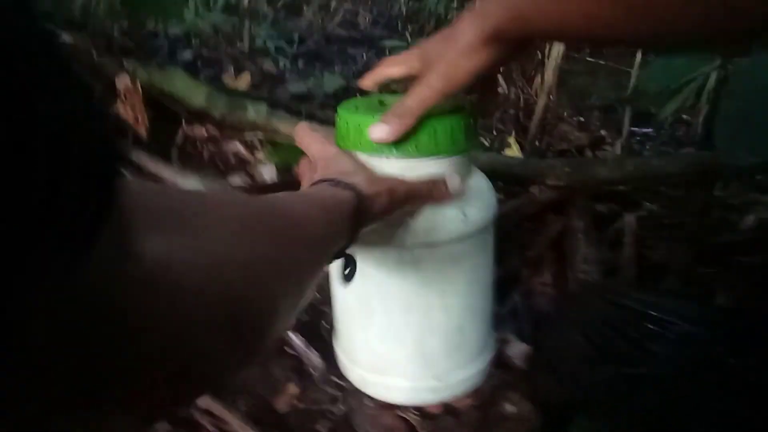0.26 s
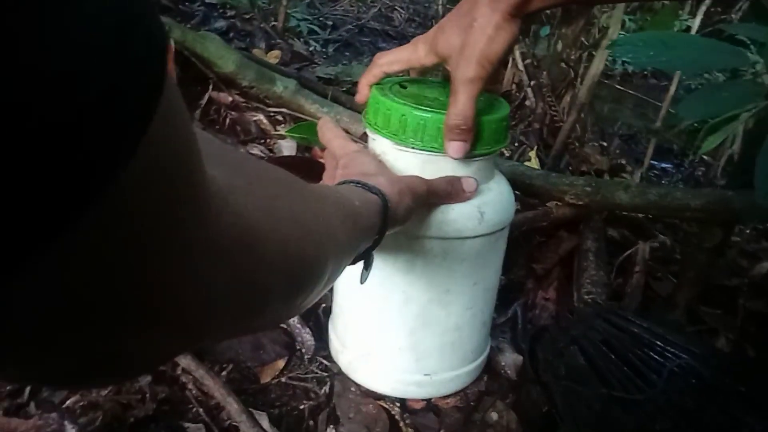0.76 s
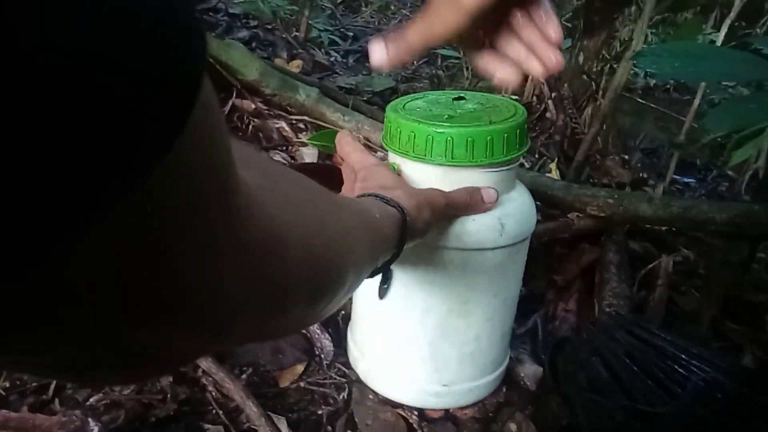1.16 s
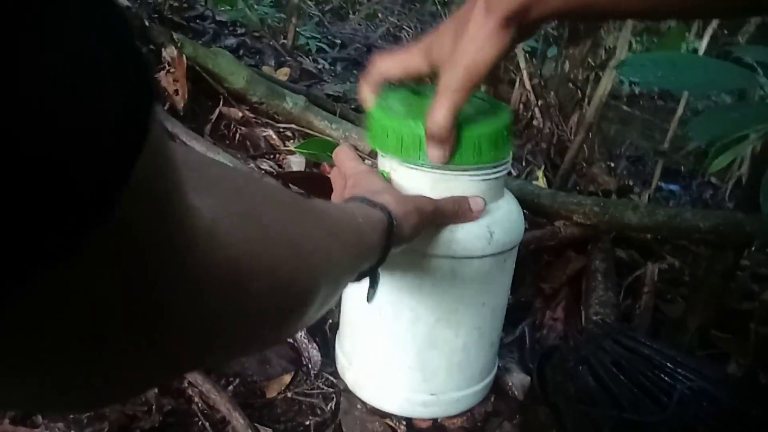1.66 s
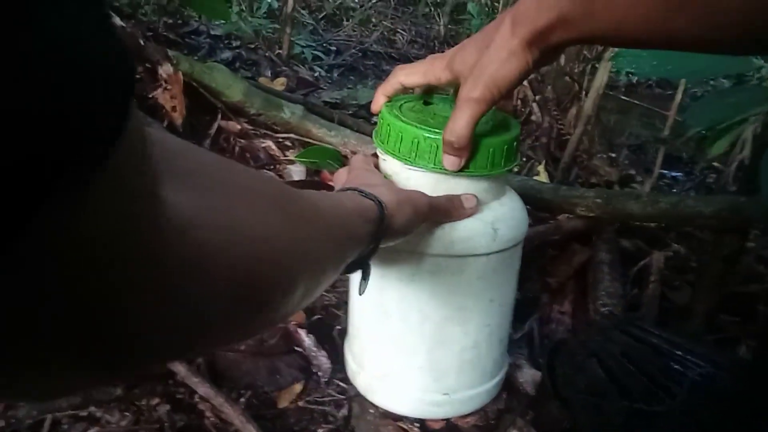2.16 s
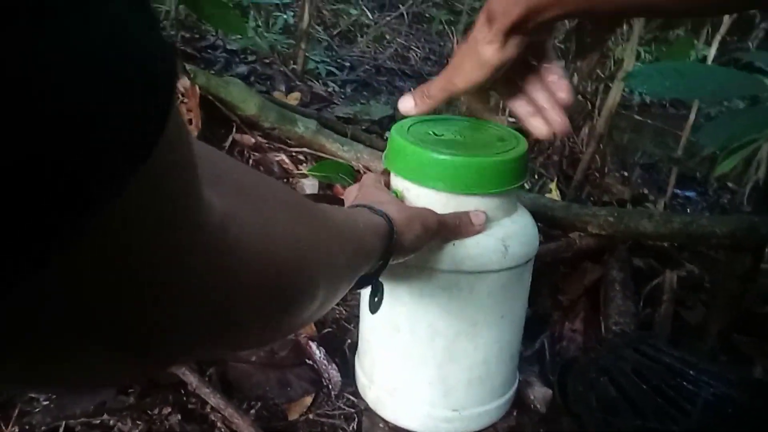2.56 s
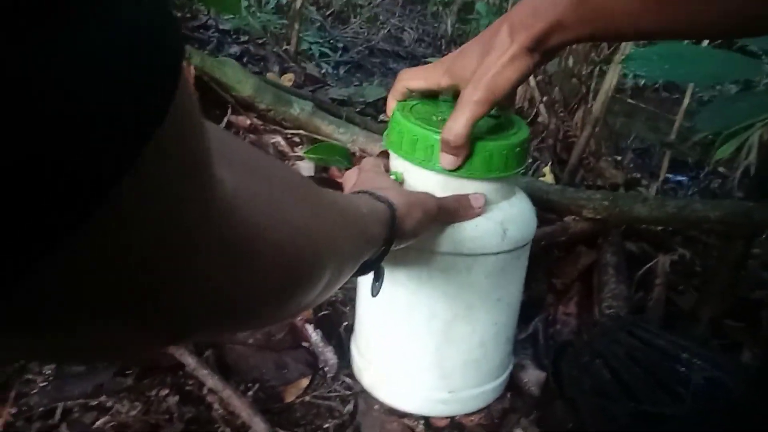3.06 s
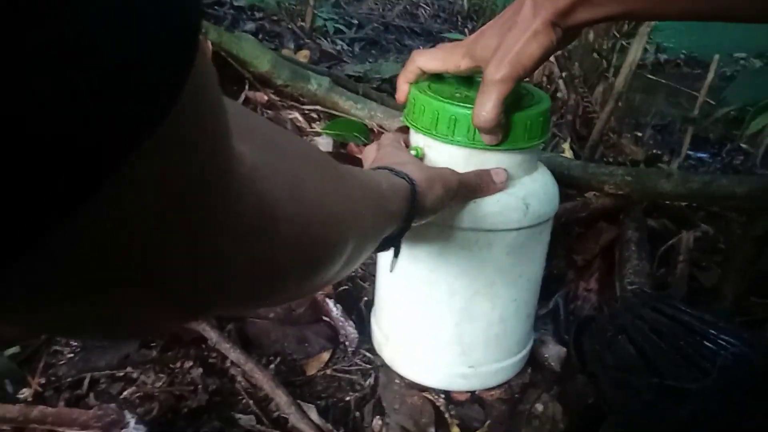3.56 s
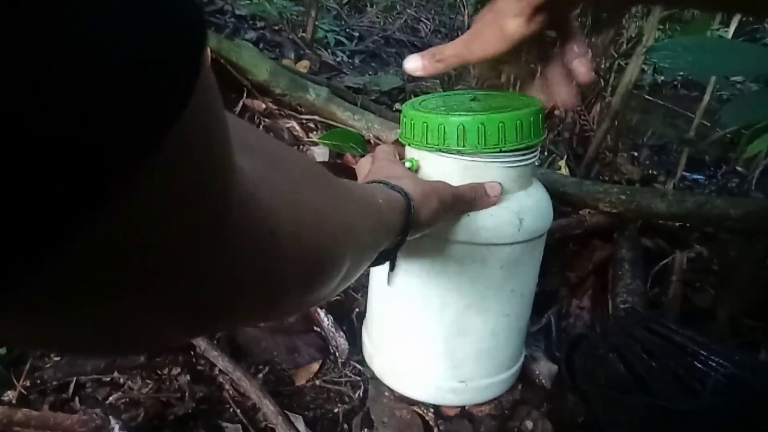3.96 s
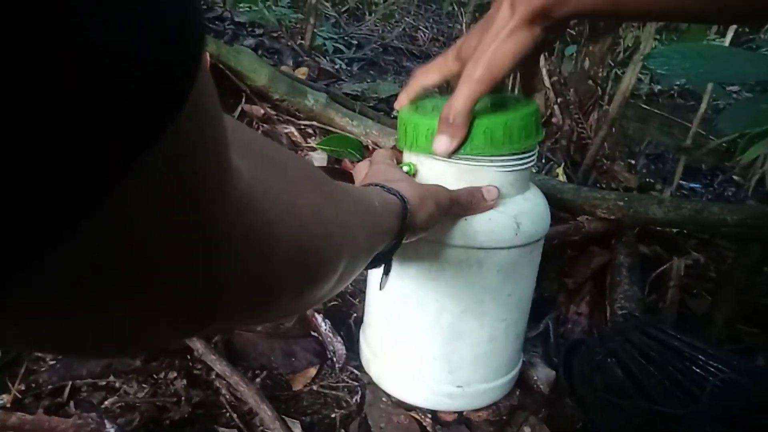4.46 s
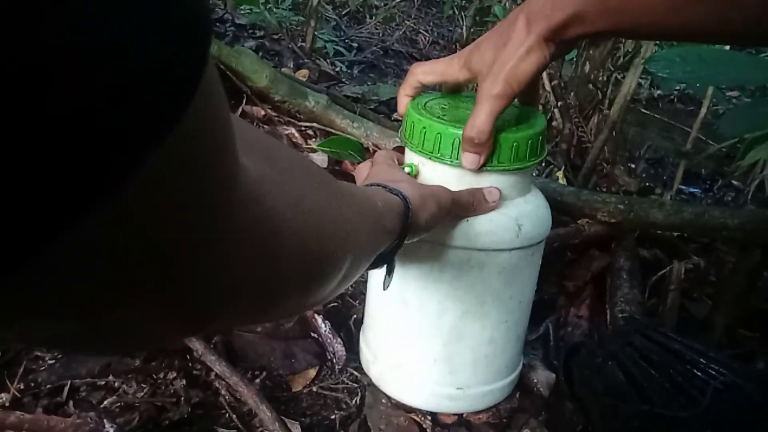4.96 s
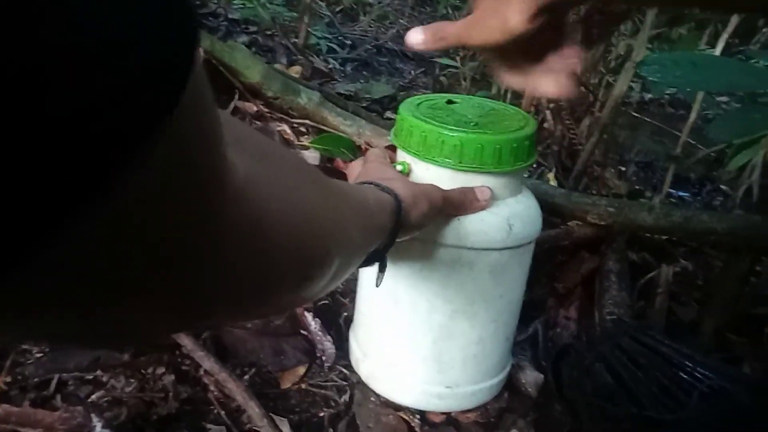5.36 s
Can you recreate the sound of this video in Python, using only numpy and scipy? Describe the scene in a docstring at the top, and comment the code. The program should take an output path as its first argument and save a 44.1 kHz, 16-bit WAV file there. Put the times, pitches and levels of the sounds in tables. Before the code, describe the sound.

Outdoors, dry and close, about 5.6 seconds. Leaf litter rustles and crackles at the start, with a dull footfall and small twig snaps, fading after 0.8 s, while soft finger taps barely sound. At 1.05 s a strong hollow plastic knock rings the big jar, followed by a short scrape and weaker knocks to 1.25. Around 1.8 s lifted-lid knocks pop higher; at 2.25-2.45 s another cluster falls in pitch. A thread scrape swells at 2.6-2.8 into knocks, then muted taps at about 3 s and near quiet. A scrape from 3.8 leads to a busy rattle of knocks until 4.0; softer ones follow at 4.3, higher pops at 4.6 and 4.95, dull taps at 5.1-5.2. A swelling scrape at 5.3 ends in the loudest round thump at 5.38. Throughout, faint shrill insects with thin gliding whines, soft airy wash, and a distant low engine throbbing about sixteen times a second, gradually weakening overall.

```python
"""A big plastic jar stands on a forest floor, close by, while a hand tries its screw lid.
The lid knocks on the neck and scrapes along the thread; each knock or finger tap rings the thin shell
and thumps the air inside, whose pitch rises when the lid is lifted.
Underfoot, leaf litter rustles, mostly at first, as random crackle through resonances; insects sing and
whine all around as narrow noise bands, and an engine throbs far away as low booms under a soft wash of air."""
import sys
import numpy as np
from scipy import signal
from scipy.fft import rfft, irfft, next_fast_len
from scipy.io import wavfile
from scipy.ndimage import map_coordinates

SR = 44100
rng = np.random.default_rng(int(sys.argv[2]) if len(sys.argv) > 2 else 0)


def to_wav(s):
    """Save 16-bit WAV."""
    ch = np.atleast_2d(s).T  # columns
    pcm = np.round(np.clip(ch, -1, 1) * 32767)  # PCM
    wavfile.write(sys.argv[1], SR, pcm.astype(np.int16))


N = 247489


def jar():
    """Knocks and scrapes leave through the jar, which is too small to radiate much bass."""
    leak_hz = 172
    bass_loss = signal.butter(4, leak_hz, "high", fs=SR, output="sos")
    return signal.sosfilt(bass_loss, knocks() + scrapes())


# The lid's edge knocks on the neck; pitch is that of the air in the jar, levels are relative:
# start_s [s], pitch_hz [Hz], air_db [dB], shell_ring_db [dB], click_db [dB]
EDGE_KNOCKS = [(1.036, 265, -31.5, -56, -68), (1.054, 258.2, -8, -23, -26.5),
               (1.173, 276.6, -16.5, -39, -55), (1.242, 285.6, -24.5, -34.5, -47),
               (1.801, 321.4, -28.5, -60, -52), (1.823, 353.2, -18.5, -48, -54),
               (1.847, 443, -17, -37, -31), (1.864, 461, -24.5, -37, -48),
               (2.253, 421.6, -14.5, -32, -36.5), (2.264, 417.8, -14, -54, -63),
               (2.296, 386.7, -22, -43, -60), (2.329, 350.2, -33.5, -44, -48.5),
               (2.425, 291, -15.5, -28.5, -29.5), (2.455, 265.8, -23.5, -54, -58),
               (2.717, 326, -13.5, -43, -41.5), (2.735, 300.4, -34, -38, -41), (2.772, 287, -15, -37, -64),
               (3.888, 233, -13, -32, -37.5), (3.916, 267.7, -23, -43, -48),
               (3.937, 431.5, -30, -28.5, -29), (3.947, 372, -29, -27.5, -36.5),
               (3.958, 291.2, -12.5, -34, -41), (3.986, 248.3, -16.5, -28.5, -42.5),
               (4.005, 290.5, -13.5, -33, -37), (4.3, 269.7, -16, -39.5, -42.5),
               (4.596, 435, -17.5, -30, -31), (4.61, 360, -40, -50.5, -61), (4.931, 434, -16, -37, -80),
               (4.944, 432.6, -16.5, -40, -69), (4.966, 416.2, -19.5, -39, -66),
               (5.376, 271.8, -4, -27.5, -35.5)]
# Fingers land on the seated lid, levels relative:
# start_s [s], air_db [dB], shell_ring_db [dB]
FINGER_TAPS = [(.269, -29, -75), (.522, -41, -46.5), (0.591, -27.5, -55), (.878, -33.5, -55.5),
               (2.946, -19.5, -55), (2.963, -15, -37), (3.013, -29, -53), (3.107, -14, -33.5),
               (3.334, -27.5, -66), (3.676, -34, -57), (3.795, -29.5, -46.5), (4.242, -28, -47.5),
               (4.35, -27, -38.5), (5.106, -19, -45), (5.139, -26, -55), (5.182, -21, -37.5)]
SEATED_HZ = 289.5  # pitch of the air under a seated lid
PAD_CLICK_DB = -38  # a soft finger pad hardly clicks: click over ring
# Decay of the air when its pitch is 300 Hz; it rings shorter when fingers press on the lid
AIR_T60_S, GRIPPED_T60_S = 0.047, 0.037


def contacts():
    """Edge knocks and finger taps in order: start_s, pitch_hz, air_db, shell_ring_db, click_db, air_t60_s."""
    edges = [(*knock, AIR_T60_S) for knock in EDGE_KNOCKS]
    pads = [(s, SEATED_HZ, air_db, ring_db, ring_db + PAD_CLICK_DB, GRIPPED_T60_S)
            for s, air_db, ring_db in FINGER_TAPS]
    return sorted(edges + pads)


# The dead clack of edge on edge, as a filter curve: pitch_hz [Hz], level_db [dB per Hz]
CLACK_COLOUR = [(150, -16.5), (500, -3), (900, -3.5), (2000, -18.5), (3200, -16), (4200, -22.5),
                (5200, -22), (7500, -24)]


def knocks():
    """Each contact thumps the air, rings the shell and clacks; hard contacts carry more treble."""
    out = np.zeros(N)
    t = np.arange(SR // 5) / SR
    phase = air_phase()
    split_hz = 2300
    low = signal.butter(2, split_hz, "low", fs=SR, output="sos")
    high = signal.butter(2, split_hz, "high", fs=SR, output="sos")
    lead_s = 0.0013  # the lid pushes air into the neck just before it lands
    for s, hz, air_db, ring_db, click_db, t60 in contacts():
        air = thump(t, phase[round(s * SR):][:len(t)], hz, t60)
        add(out, s - lead_s, amp(air_db - 1.0) * air)
        onset = 1 - np.exp(-t / .0015)
        ring = struck(shell_ring(t, spread_db=2.5) * onset)
        rattle = chatter(t, rise=0.0022, t60=0.049, tail_db=-30.0, tail_t60=0.19)
        clack = struck(filtered(rattle, colour(CLACK_COLOUR)))
        blow = ring + clack
        dull = struck(signal.sosfilt(low, blow))
        bright = struck(signal.sosfilt(high, blow))
        # opposite signs join the two bands smoothly
        add(out, s, amp(ring_db + 0.93) * dull - amp(click_db) * bright)
    return out


def air_phase():
    """Phase of the air in the jar: its pitch glides between contacts as the gap under the lid changes."""
    return 2 * np.pi * np.cumsum(curves(contacts())[0]) / SR


def thump(t, phase, hz, base_t60):
    """The air in the jar swells over a cycle or two and rings; the flexing wall adds a lower note."""
    opening = hz / 300
    t60 = base_t60 * opening ** 0.99  # a lifted lid damps the air less
    tail_db, tail_t60 = -22, .11
    wall_hz, wall_t60 = 228, .045
    # a seated lid drives the wall, a lifted one hardly does
    wall = amp(-8.5 - 60 * t / wall_t60) / opening ** 4
    air = amp(-60 * t / t60) + amp(tail_db - 60 * t / tail_t60)
    swell = 1 - np.exp(-(t / .0055) ** 2)
    air_note = air * np.sin(phase - phase[0])
    wall_note = wall * np.sin(2 * np.pi * wall_hz * t)
    x = swell * (air_note + wall_note)
    return x / np.abs(x).max()


# Resonances of the plastic shell and lid: pitch_hz [Hz], width_hz [Hz], level_db [dB]
SHELL_MODES = [ (512, 36, 12), (1020, 70, 5), (1385, 55, 1), (1585, 28, 5), (1662, 28, 6), (2280, 50, -3),
               (2930, 80, -5), (3035, 60, -4), (3250, 40, 0), (3450, 90, -4), (3670, 35, -5),
               (4900, 110, -7), (5260, 80, -6), (5490, 90, -9), (6280, 70, -7), (7200, 250, -9), ]


def shell_ring(t, spread_db):
    """The shell's modes ring on, at random strengths as if the lid landed in a different place."""
    hz, width, db = np.transpose(SHELL_MODES)[:, :, None]
    level = rng.standard_normal(hz.shape)
    turn = rng.random(hz.shape)
    strength = width * amp(db + spread_db * level)
    decay = np.exp(-np.pi * width * t)
    return np.sum(strength * decay * np.sin(2 * np.pi * (hz * t + turn)), axis=0)


# Twists of the lid; friction_db is the relative friction at the end, swell_db its change along the twist:
# start_s [s], length_s [s], friction_db [dB], swell_db [dB]
LID_TWISTS = [(1.168, 0.09, -40, 7.5), (1.775, 0.023, -50, -5), (2.604, 0.17, -38.5, 16.5),
              (2.961, 0.047, -56, 3.5), (3.088, 0.097, -57, -7), (3.782, .155, -39.5, 15.5),
              (3.929, 0.08, -39, 4), (4.279, 0.12, -51, -5), (4.598, 0.056, -57.5, -2),
              (5.267, 0.12, -36.5, 19)]
# Thread friction, as a filter curve: pitch_hz [Hz], level_db [dB per Hz]
FRICTION_COLOUR = [(120, -21), (250, 25), (500, -1), (900, 5.5), (2100, -5), (3300, -2.5), (4200, -6),
                   (5200, -2), (7400, -2), (8500, -17)]
GRIP_DB_PER_S, LET_GO_DB_PER_S = 454.5, 899  # how fast friction builds before a twist and dies after it
HISS_DB, CATCH_RING_DB, STIR_DB = 7, 5.5, 9.5  # friction as hiss, as shell ring and as stirred air


def scrapes():
    """The thread rubs on the neck: fine slips hiss, coarser catches ring the shell, both stir the air."""
    twists = sum(stroke(s, s + length, db, GRIP_DB_PER_S, LET_GO_DB_PER_S, swell)
                 for s, length, db, swell in LID_TWISTS)
    force = twists * amp(2.1 * wobble(110))
    slips = force * grit(rate=6000, spread_db=0.5)
    catches = force * grit(rate=320, spread_db=3)
    hiss = filtered(slips + .55 * catches, colour(FRICTION_COLOUR))
    ring = filtered(catches + .5 * slips, body(SHELL_MODES))
    air = force * unit((narrow(width_hz=180) * np.exp(1j * air_phase())).real)
    return amp(HISS_DB) * hiss + amp(CATCH_RING_DB) * ring + amp(STIR_DB) * air


# A foot shifts in the leaf litter, relative peak levels: start_s [s], level_db [dB]
FOOT_SCUFFS = [(0.01, -42.5), (.22, -54.5), (.3, -57.5), (.41, -51), (0.609, -43.5), (1.358, -67),
               (1.631, -64.5), (2.05, -59), (3.3, -58), (5.599, -57)]
# Leaf rustle, as a filter curve: pitch_hz [Hz], level_db [dB per Hz]
LITTER_COLOUR = [(88, -58.5), (150, 3.5), (286, -2), (367, -8.5), (788, -12.5), (1120, -12), (2780, -22),
                 (6260, -31), (6800, -34.5), (7900, -36.5), (10300, -69.5), (17400, -120)]
# Footfalls and twigs in the litter: start_s [s], centre_hz [Hz], width_hz [Hz], level_db [dB], t60_s [s]
TWIG_CRACKS = [(0.014, 224, 111, -30, 0.037), (0.268, 494, 425, -31, 0.1),
               (0.353, 2200, 5940, -34.5, 0.018), (0.523, 3630, 6230, -49.5, 0.0036),
               (.75, 3000, 4050, -59.5, 0.014), (.777, 635, 804, -49, 0.028)]
# The leaves crush, spring back, and never quite rest (relative level)
PRESS_DB_PER_S, SETTLE_DB_PER_S, LEAVES_REST_DB = 208, 136, -81
TICKS_PER_S, TICK_DB = 100, -13.5  # stray dry leaves snap under the foot


def litter():
    """Dry leaves of every size scuff and crackle under a shifting foot, which thuds and snaps a few twigs."""
    crackle = np.zeros(N)
    for hz in np.geomspace(250, 7000, 10):  # large leaves to small
        slips = grit(rate=3000, spread_db=3.5) * amp(3 * wobble(50))
        crackle += filtered(slips, body([(hz, hz / 4, 0)]))
    scuffs = sum(stroke(s, s, db, PRESS_DB_PER_S, SETTLE_DB_PER_S) for s, db in FOOT_SCUFFS)
    weight = amp(LEAVES_REST_DB) + scuffs
    out = weight * amp(3 + 1.2 * wobble(40)) * unit(filtered(crackle, colour(LITTER_COLOUR)))
    leaf = body([(1070, 300, 5), (3160, 10000, -8)])
    ticks = unit(filtered(grit(rate=TICKS_PER_S, spread_db=1), leaf))
    out += weight * amp(TICK_DB) * ticks
    t = np.arange(SR // 8) / SR
    for s, hz, width, db, t60 in TWIG_CRACKS:
        snap = chatter(t, rise=0.00009, t60=t60, tail_db=-17.0, tail_t60=0.079)
        add(out, s, amp(db) * struck(filtered(snap, lambda f: body([(hz, width, 0)])(f) ** 2)))
    return out


# Gliding insect whines: start_s [s], end_s [s], from_hz [Hz], to_hz [Hz], level_db [dB]
INSECT_WHINES = [(2.277, 2.42, 3620, 3620, -68), (2.52, 2.95, 2403, 2770, -63),
                 (3.035, 3.802, 7800, 6950, -59.5), (3.156, 3.325, 3346, 3218, -66),
                 (4.031, 4.323, 5889, 5640, -66.5), (4.504, 5.598, 5600, 5880, -74.5),
                 (5.019, 5.145, 5240, 5380, -70)]
WHINE_FADE_DB_PER_S = 145.5


def insects():
    """A steady shrill chorus of narrow noise bands, with single whines that glide above and below it."""
    t = np.arange(N) / SR
    chorus_hz, spread_hz = 6600, 6850
    out = amp(-66.5) * (narrow(width_hz=270) * np.exp(2j * np.pi * chorus_hz * t)).real
    out += amp(-72.5) * (narrow(width_hz=900) * np.exp(2j * np.pi * spread_hz * t)).real
    for start, end, from_hz, to_hz, db in INSECT_WHINES:
        hz = curves([(start, from_hz), (end, to_hz)])[0]
        level = stroke(start, end, db, WHINE_FADE_DB_PER_S, WHINE_FADE_DB_PER_S)
        # each insect's note is fuzzy and pulses unevenly
        flutter = narrow(width_hz=.014 * from_hz + 30) * amp(3 * wobble(25))
        out += level * (flutter * np.exp(2j * np.pi * np.cumsum(hz) / SR)).real
    return out


# The far engine's level: start_s [s], level_db [dB]
ENGINE_LEVEL = [(0, -52), (1.5, -56.5), (2.3, -61), (4, -57.5), (5.6, -67)]


def engine():
    """A slow one-cylinder engine far off: only the soft low boom of each firing carries through the trees."""
    firing_hz = 16.06  # mean rate, which wanders slightly
    turns = np.cumsum(firing_hz * (1 + 0.014 * wobble(1.5))) / SR + 0.403
    firings = np.diff(np.floor(turns), prepend=0) * amp(2.2 * wobble(23))
    boom = unit(filtered(firings, lambda f: body([(113, 46, 0)])(f) ** 2))
    return amp(curves(ENGINE_LEVEL)[0]) * boom


# Air in the trees, as a filter curve: pitch_hz [Hz], level_db [dB per Hz]
FOREST_COLOUR = [(15, -80.5), (25, -26), (103, -8), (158, -10.5), (213, -16), (666, -24), (729, -24),
                 (855, -22), (1180, -24.5), (1260, -29.5), (1730, -27.5), (4410, -38), (5800, -40),
                 (7540, -80), (12800, -120)]


def forest():
    """The soft wash of air in the trees: coloured noise whose level wavers a little."""
    wash = unit(filtered(rng.standard_normal(N), colour(FOREST_COLOUR)))
    return amp(-57.0 + .8 * wobble(5.1)) * wash


def amp(db):
    """Gain of a level in dB."""
    return 10 ** (np.asarray(db) / 20)


def unit(x):
    """Scale to rms 1."""
    return x / np.sqrt(np.mean(x ** 2) + 1e-20)


def struck(x):
    """Scale a blow to rms 1 over its first 10 ms."""
    return x / np.sqrt(np.mean(x[:SR // 100] ** 2) + 1e-20)


def add(track, s, x):
    """Mix x into track at time s."""
    part = track[max(round(s * SR), 0):][:len(x)]
    part += x[:len(part)]


def curves(rows):
    """One value per sample for each column after the time."""
    s, *cols = np.transpose(rows)
    return [np.interp(np.arange(N) / SR, s, c) for c in cols]


def stroke(start, end, db, rise, fall, swell_db=0):
    """Gain that rises (dB/s), swells steadily from start to end up to db, then falls (dB/s)."""
    t = np.arange(N) / SR
    held = db + np.interp(t, [start, end], [-swell_db, 0])
    return amp(held - rise * np.maximum(start - t, 0) - fall * np.maximum(t - end, 0))


def wobble(rate):
    """A smooth random curve, rate knots a second."""
    knots = rng.standard_normal(int(N * rate / SR) + 4)
    return map_coordinates(knots, [np.arange(N) * rate / SR])


def grit(rate, spread_db):
    """Tiny slips at random moments and of unequal size, rate a second."""
    moments = rng.random(N) < rate / SR
    return unit(moments * rng.standard_normal(N) * amp(spread_db * rng.standard_normal(N)))


def chatter(t, rise, t60, tail_db, tail_t60):
    """A contact is a brief burst of rattling between hard edges, then a weak buzz."""
    decay = amp(-60 * t / t60) + amp(tail_db - 60 * t / tail_t60)
    return rng.standard_normal(len(t)) * (1 - np.exp(-t / rise)) * decay


def narrow(width_hz):
    """Slow complex noise, each part of rms 1: the flutter of a narrow band."""
    def slow():
        return unit(filtered(rng.standard_normal(N), lambda f: 1 / (1 + (f / width_hz) ** 2)))
    return slow() + 1j * slow()


def filtered(x, response):
    """x times a complex response of frequency."""
    m = next_fast_len(len(x) + SR // 8)
    return irfft(rfft(x, m) * response(np.fft.rfftfreq(m, 1 / SR)), m)[:len(x)]


def colour(points):
    """Response through (Hz, dB) points on a log axis."""
    hz, db = np.transpose(points)
    return lambda f: amp(np.interp(np.log(f + 1), np.log(hz + 1), db))


def body(modes):
    """Causal response of (Hz, width Hz, dB) resonances."""
    return lambda f: sum(amp(db) * 1j * f * w / (c * c - f * f + 1j * f * w) for c, w, db in modes)


def scene():
    """The jar close by, the forest around it."""
    return (jar() + litter() + insects() + engine() + forest())[None]


def record(dry):
    """The microphone's band ends steeply near 8 kHz; a very faint electronic hiss lies over it."""
    top_hz = 7700
    sound = filtered(dry[0], lambda f: 1 / np.sqrt(1 + (f / top_hz) ** 80))
    hiss = amp(-79.5) * rng.standard_normal(N)
    return filtered(sound + hiss, lambda f: f < 15500)[None]


dry = scene()
out = record(dry)
to_wav(out)
```